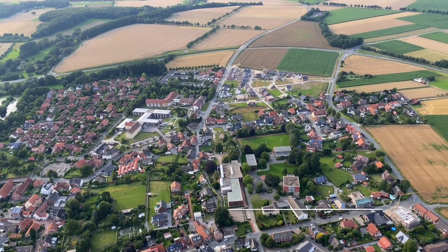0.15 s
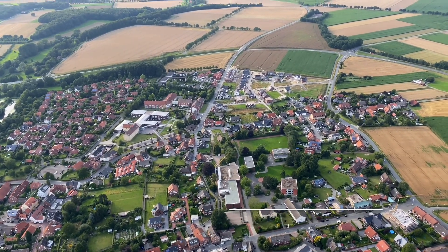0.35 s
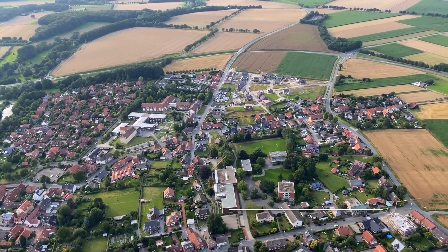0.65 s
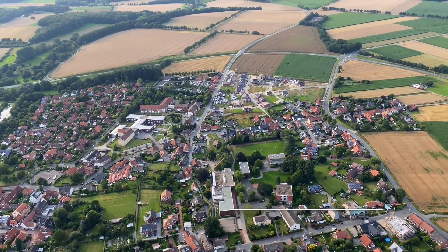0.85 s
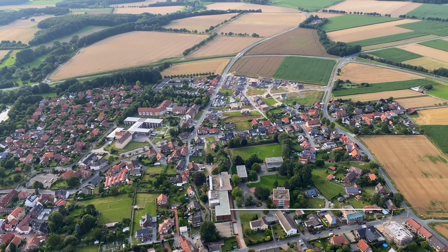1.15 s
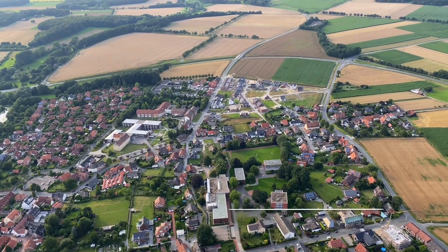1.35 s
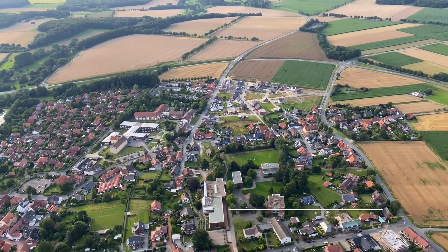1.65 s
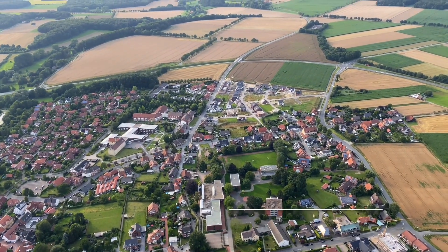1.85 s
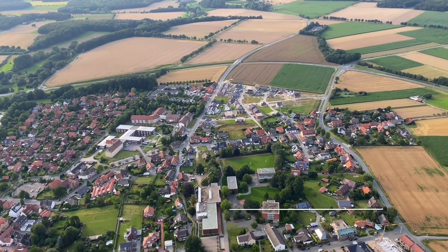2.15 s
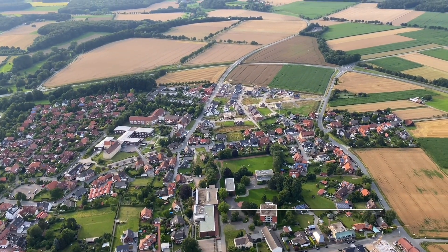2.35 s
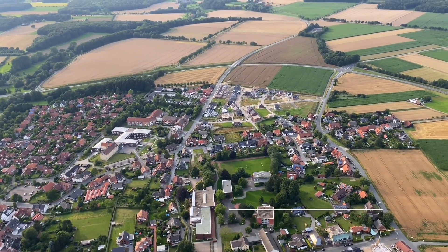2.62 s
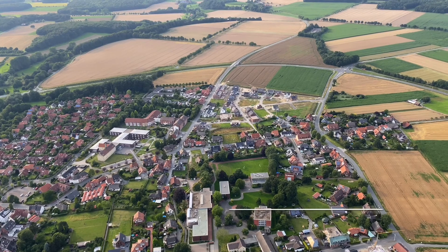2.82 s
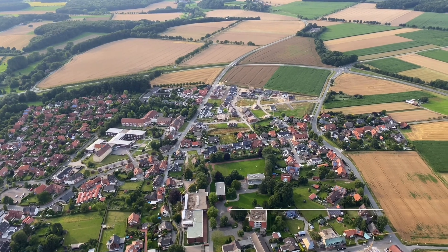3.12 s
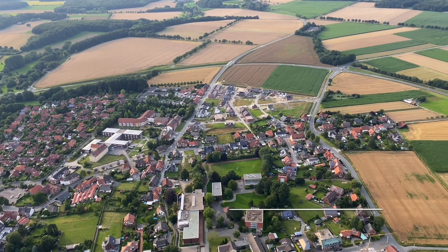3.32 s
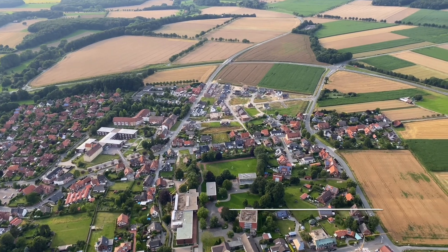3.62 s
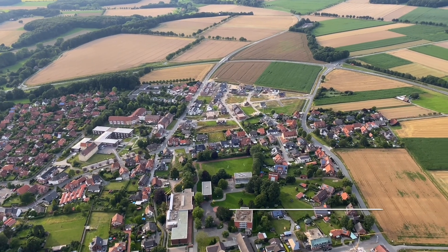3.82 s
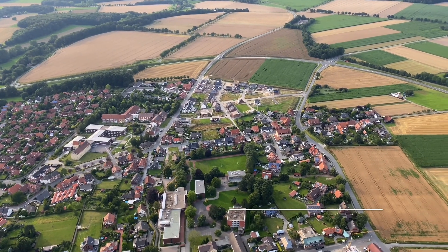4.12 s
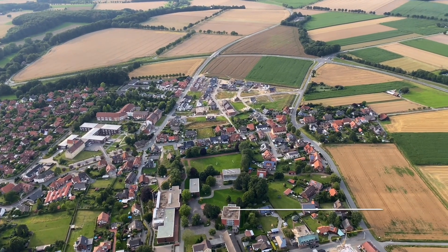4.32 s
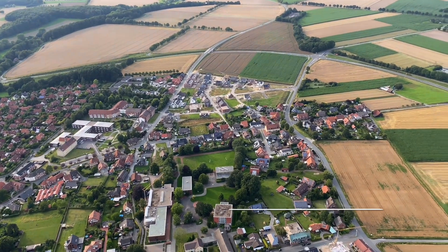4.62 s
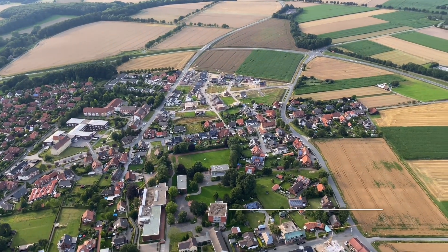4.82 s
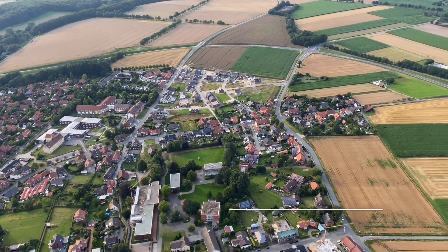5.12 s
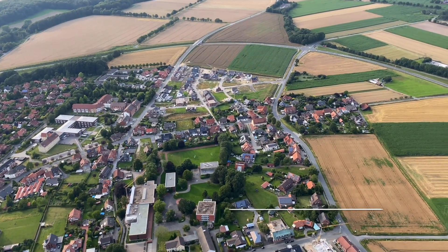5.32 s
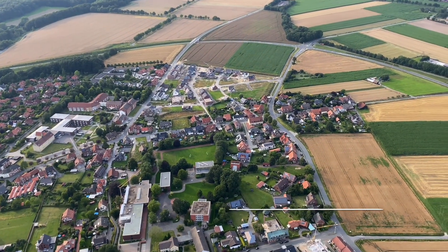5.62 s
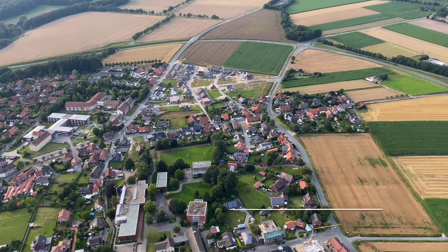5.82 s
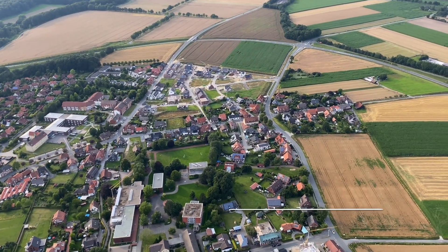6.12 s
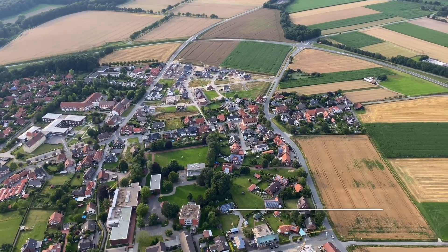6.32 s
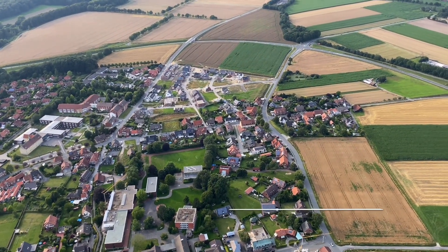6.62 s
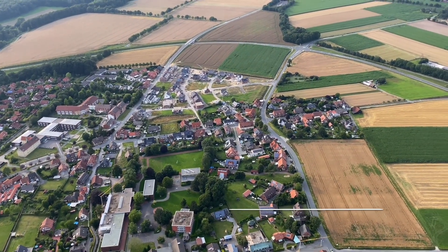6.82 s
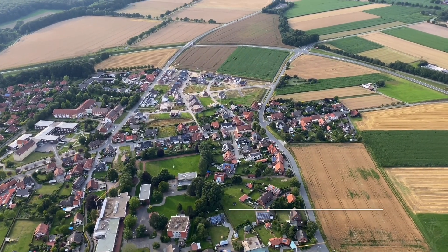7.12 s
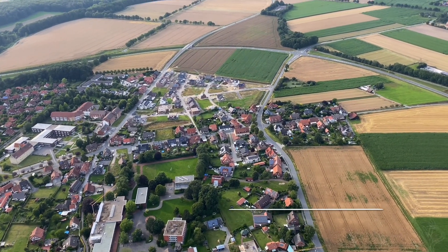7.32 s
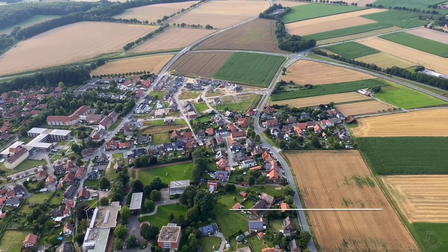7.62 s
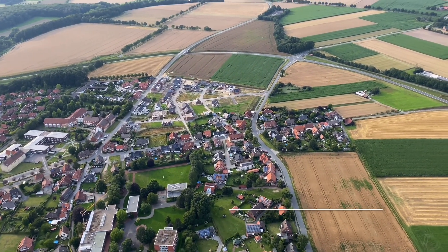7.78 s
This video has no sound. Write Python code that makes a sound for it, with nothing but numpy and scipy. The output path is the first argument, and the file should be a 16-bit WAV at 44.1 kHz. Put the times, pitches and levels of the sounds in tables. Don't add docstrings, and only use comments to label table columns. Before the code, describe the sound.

Small aircraft cabin in flight, heard on a handheld stereo microphone. Wind briefly bumps it, then a steady bass-heavy piston engine hum and propeller throb continue. Later a draught swells from the left with heavy low knocks and roar. The low end abruptly cuts away, leaving a dry, spitting, sizzling rush with sharp little ticks and a dull bump near the end, the engine faint and unsteady beneath.

```python
import sys
import numpy as np
from scipy import signal
from scipy.fft import rfft, irfft
from scipy.io import wavfile
from scipy.ndimage import uniform_filter1d, minimum_filter1d

SR = 44100
rng = np.random.default_rng(int(sys.argv[2]) if len(sys.argv) > 2 else 0)


def transcribe(signal):
    frames = np.atleast_2d(signal).T
    limited = np.clip(frames, -1, 1)
    pcm = np.round(limited * 32767).astype(np.int16)
    wavfile.write(sys.argv[1], SR, pcm)


def voltage_ratio(level):
    return 10 ** (np.asarray(level, float) / 20)


N = 350595

# (time [s], rate [turns/s])
CRANK_SPEED = [(0, 72.17), (.6, 72.25), (1.4, 72.02), (2.4, 71.93), (3.1, 72.17), (3.6, 72.13),
               (4.1, 72.35), (5, 72.1), (8, 72.1)]
# (multiple of crank rate [-], left level [dB], right level [dB])
ENGINE_ORDERS = [(1, -18.6, -18.8), (2, -17.0, -17.1), (4, -35.0, -36.5), (6, -38.6, -44.4),
                 (8, -41.4, -45.7), (10, -44.1, -49.6), (13, -44.6, -49.2), (14, -45.0, -51.1),
                 (15, -51.4, -55.9), (16, -51.2, -55.1), (17, -52.6, -56.5), (18, -42.6, -50.0),
                 (20, -48.0, -62.3), (21, -49.1, -54.0), (22, -45.9, -70.4), (23, -51.7, -52.2),
                 (25, -51.4, -61.5), (26, -49.7, -57.6), (28, -52.7, -60.2), (30, -61.1, -63.7),
                 (31, -58.2, -62.2), (32, -58.1, -77.7), (33, -52.3, -67.9), (35, -59.1, -64.4),
                 (36, -61.3, -72.4), (37, -58.1, -80.7), (38, -49.8, -64.7), (39, -66.3, -72.5),
                 (40, -64.9, -78.6), (48, -66.0, -71.8)]
# (multiple of blade rate [-], left level [dB], right level [dB])
BLADE_ORDERS = [(1, -31.3, -29.8), (2, -22.6, -21.6), (3, -38.5, -43.0), (4, -33.4, -37.0),
                (5, -39.6, -45.6), (6, -41.1, -43.4), (7, -37.0, -49.4), (8, -37.2, -44.0),
                (10, -44.6, -47.9), (11, -49.9, -62.1), (12, -43, -48), (13, -55.8, -66.0),
                (14, -46.8, -62.3), (15, -49.0, -63.2), (16, -57.6, -65.3), (17, -51.6, -64.1),
                (18, -57.7, -67.8), (22, -61.9, -76.3)]
# (time [s], level [dB])
FIRING = [
    [(0, -15), (1.01, -14), (1.08, -20), (1.9, -16.5), (4.3, -13.5), (4.99, -22.5)],
    [(5.03, -30.5), (5.5, -31), (5.75, -44), (6.1, -29), (6.36, -40.5), (6.48, -22), (6.64, -21.5),
     (6.69, -30), (6.93, -23.5), (7.17, -35.5), (7.55, -28.5), (7.95, -25.5)],
]
# (time [s], level [dB])
WIND = [
    [(0, -24), (.1, -15), (.45, -17.5), (.64, -15), (.8, -21.5), (1.1, -33.5), (3, -29.5), (3.95, -20.5),
     (4.1, -14.5), (4.3, -10), (4.62, -8.5), (4.99, -9.5)],
    [(5.03, -28), (5.6, -30.5), (6.2, -36.5), (6.5, -35), (7.2, -33), (7.95, -46.5)],
]
# (time [s], peak [dB])
KNOCKS = [(0.08, -14.5), (0.111, -19.5), (0.194, -19), (0.392, -14.5), (0.437, -16), (0.575, -15),
          (0.64, -14), (0.695, -17), (0.752, -22), (0.85, -16.5), (0.96, -18), (3.363, -20.5), (4.159, -14),
          (4.198, -13.5), (4.23, -11), (4.302, -19.5), (4.4, -12), (4.505, -4), (4.56, -2), (4.434, -5.5),
          (4.717, -4.5), (4.772, -6), (4.869, -6.5)]
# (time [s], level [dB], crackle above usual share [dB])
DRAUGHT = [(3.6, -73, 0), (4.08, -41.5, -2), (4.19, -42, -0.5), (4.22, -33.5, -1), (4.25, -38.5, -1.5),
           (4.57, -24, -2), (4.65, -26.5, -2.5), (4.92, -24, -2), (5.05, -26.5, -2.5), (5.4, -28, 1),
           (5.82, -30.5, 4), (5.9, -33, 1.5), (6.2, -32.5, 1.5), (6.5, -30.5, 0), (7.2, -30.5, -0.5),
           (7.95, -30, -1.5)]
# (time [s], peak [dB])
SNAPS = [(0.821, -33.5), (4.232, -36), (4.4376, -31.5), (4.4612, -33), (4.5025, -38.5), (4.6323, -21.5),
         (4.762, -36.5), (4.825, -37), (5.0574, -36), (5.7498, -35.5), (5.793, -25.5), (5.9712, -30),
         (6.166, -31), (6.2717, -32.5), (6.3086, -30), (6.4545, -38.5), (6.575, -35.5), (6.6386, -30.5),
         (6.8632, -27), (6.9082, -30.5), (6.9368, -28), (7.059, -34.5), (7.099, -34.5), (7.206, -30.5),
         (7.3732, -22), (7.486, -34), (7.5273, -36), (7.6235, -35.5), (7.727, -32), (7.8827, -34.5)]
# (time [s], pitch [Hz], peak [dB], half length [s])
BUMP = (7.495, 212, -19.5, .03)
# (frequency [Hz], density [dB/Hz])
BOOM_COLOUR = [(20, -40), (45, -4.5), (65, 4.5), (120, 4.5), (230, 3), (330, -4.5), (500, -32), (900, -60)]
BOOM_FILTERED_COLOUR = [(20, -45), (35, -22), (50, -6.5), (90, 4), (180, 2), (300, -9), (500, -11.5),
                        (900, -59.5)]
# (frequency [Hz], density [dB/Hz])
HISS_COLOUR = [(250, -56.5), (400, -52), (600, -57), (750, -59.5), (900, -62.5), (1100, -63.5),
               (1500, -64.5), (2200, -74), (3200, -79), (4800, -86.5), (6200, -98), (10200, -99),
               (12500, -100), (15800, -104)]
# (frequency [Hz], density [dB/Hz])
BUFFET_COLOUR = [(120, -3), (250, 2), (350, 4), (550, -9.5), (800, -26), (1300, -30.5), (2500, -77)]
ROAR_COLOUR = [(300, -7), (500, 1), (750, -3), (1100, -10.5), (1700, -18.5), (3000, -57.5)]
# (frequency [Hz], density [dB/Hz])
RUSH_COLOUR = [(150, 5.5), (350, -1.5), (700, 0.5), (1200, 2.5), (2000, -1), (3000, -19.5), (4200, -34.5),
               (6500, -49)]
CRACKLE_COLOUR = [(900, -18), (1800, 0.5), (2600, 0), (4200, -8.5), (5500, -18), (6500, -24.5),
                  (9000, -42.5)]
SIZZLE_COLOUR = [(4500, -20.5), (6500, -5), (8000, -1.5), (10000, -4.5), (13000, -16), (15800, -15.5)]
# (frequency [Hz], level [dB], lead [rad], likeness [0-1])
PORTS_CABIN = [(60, -0.1, -0.1, 1.0), (250, 0.2, -0.39, 0.97), (400, -3.2, -1.12, 0.75),
               (550, -5.6, -2.2, 0.71), (750, -7.5, -2.95, 0.85), (1000, -3.5, -3.53, 0.95),
               (1300, -6.3, -4.32, 0.77), (1600, -9.9, -4.09, 0.4), (2000, -5.6, -6.92, 0.85),
               (2700, -13.2, -6.4, 0.64), (3500, -7.2, -7.46, 0.74), (5000, -7.6, -6.13, 0.43),
               (6200, 1.1, -6.7, 0.58), (6800, 1.2, -6.26, 0.82)]
PORTS_DRAUGHT = [(40, 1.4, -0.34, 0.74), (150, 0.2, -0.47, 0.94), (500, -1.0, -1.01, 0.95),
                 (700, -7.5, -1.27, 0.81), (830, -12.2, -0.56, 0.35), (950, -11.4, 0.62, 0.47),
                 (1250, -10.3, 0.76, 0.71), (1500, -10.5, -0.15, 0.81), (2900, -10.2, -0.87, 0.9),
                 (4000, -7.4, -0.3, 0.9), (5000, -12.4, -0.04, 0.73), (5600, -14.5, -0.47, 0.38),
                 (6200, -4.3, -0.65, 0.77), (6800, -0.2, -0.04, 0.96)]
PORTS_FLOW = [(40, 0, -.1, .99), (200, .3, -.3, .99), (400, -2, -.8, .93), (700, -6, -1.2, .85),
              (1000, -11, -.6, .6)]

T = np.arange(N) / SR
HZ = np.maximum(np.arange(N // 2 + 1) * SR / N, 1)
FILTERED = np.clip((T - 5.01) / 0.012 + 0.5, 0, 1)


def curves(rows):
    s, *columns = np.transpose(rows)
    return [np.interp(T, s, c) for c in columns]


def over_hz(rows, hz=HZ):
    at, *columns = np.transpose(rows)
    return [np.interp(np.log(hz), np.log(at), c) for c in columns]


def walk(rate_hz):
    k = int(SR / rate_hz)
    held = np.repeat(rng.standard_normal(N // k + 1), k)
    return 0.62 * uniform_filter1d(uniform_filter1d(held, k), k)[:N]


def unit(x):
    return x / np.sqrt(np.mean(x ** 2))


def heard(envelope, colour, ports, noisy=True):
    source = envelope * (rng.standard_normal((2, N)) if noisy else np.ones((2, 1)))
    spectra = rfft(source) * voltage_ratio(over_hz(colour)[0]) * np.sqrt(SR / 2)
    near, other = np.minimum(HZ / colour[0][0], 1) ** 3 * spectra
    db, lead_rad, like = over_hz(ports)
    treble_from_hz, turn_hz = 6750, 4420
    treble = HZ > treble_from_hz
    lead_rad[treble] = 2 * np.pi * (HZ[treble] - treble_from_hz) / turn_hz
    db[treble], like[treble] = 0, 0.994
    mixed = like * near + np.sqrt(1 - like ** 2) * other
    right = voltage_ratio(db) * np.exp(1j * lead_rad) * mixed
    return irfft(np.array([near, right]), N)


def bursts(rate_hz, spread_db, width_s, most):
    when, size = rng.random((2, N))
    size_db = spread_db * np.minimum(-np.log(size + 1e-9), most)
    hits = (when < rate_hz / SR) * voltage_ratio(size_db)
    shape = np.exp(-(np.arange(-300, 300) / SR / width_s) ** 2)
    return unit(signal.fftconvolve(hits, shape, "same"))


CRANK_TURNS = np.cumsum(curves(CRANK_SPEED)[0]) / SR
BLADE_TURNS = 1.4115 * CRANK_TURNS
FIRING_DB = curves(FIRING[0] + FIRING[1])[0]
DRAUGHT_DB, CRACKLE_EXTRA_DB = curves(DRAUGHT)
OVER_DUCK_DB = np.maximum(DRAUGHT_DB + 39, 0)
CABIN_GAIN = voltage_ratio(-9.5 * FILTERED - 1.16 * OVER_DUCK_DB)


def cabin_hiss():
    throb = 1 + 0.22 * np.cos(2 * np.pi * CRANK_TURNS)
    throb += 0.3 * np.cos(2 * np.pi * BLADE_TURNS) + 0.25 * np.cos(4 * np.pi * BLADE_TURNS)
    flicker = voltage_ratio(0.5 * walk(40) + 1.2 * walk(250))
    return CABIN_GAIN * heard(unit(throb * flicker), HISS_COLOUR, PORTS_CABIN)


def wind_boom():
    boom_db = -12 - 7.5 * FILTERED + 0.41 * (FIRING_DB + 16) + 0.76 * walk(9)
    swell = voltage_ratio(0.8 * walk(20))
    full = unit(heard(swell, BOOM_COLOUR, PORTS_FLOW))
    thinned = unit(heard(swell, BOOM_FILTERED_COLOUR, PORTS_FLOW))
    return voltage_ratio(boom_db - 3.0) * (full + (thinned - full) * FILTERED)


def stack(turns, orders, gains, waver_db):
    out = np.zeros((2, N))
    shake_db = 1.2 + 1.3 * FILTERED
    for k, left_db, right_db in orders:
        angle = 2 * np.pi * (k * turns + rng.random())
        lead_rad = over_hz(PORTS_CABIN, k * turns[-1] / T[-1])[1]
        waver = waver_db * walk(4)
        if k < 5:
            waver = waver + shake_db * walk(16)
        size = np.sqrt(2) * gains(k, left_db) * voltage_ratio(waver)
        out[0] += voltage_ratio(left_db) * size * np.cos(angle)
        out[1] += voltage_ratio(right_db) * size * np.cos(angle + lead_rad)
    return out


def engine_and_propeller():
    drift_db = 2 + 0.5 * FILTERED
    crank_db = -16.5 - 24.5 * FILTERED + drift_db * walk(7)
    blade_db = -21 - 11.5 * FILTERED - 0.25 * OVER_DUCK_DB + drift_db * walk(8.3)
    firing_db = FIRING_DB + 1.3 * walk(11)
    low_db = {1: crank_db - 3.2, 2: firing_db - 0.5}
    fourth = voltage_ratio(0.75 * (firing_db + 17))

    def engine_gain(k, left_db):
        if k in low_db:
            return voltage_ratio(low_db[k] - left_db)
        return fourth if k == 4 else CABIN_GAIN

    def blade_gain(k, left_db):
        return voltage_ratio(blade_db + 22.0 - 3.0 * FILTERED) if k < 5 else CABIN_GAIN

    tones = stack(CRANK_TURNS, ENGINE_ORDERS, engine_gain, waver_db=1.5)
    tones += stack(BLADE_TURNS, BLADE_ORDERS, blade_gain, waver_db=1.4)
    return voltage_ratio(0.43) * tones


def bump():
    s, hz, peak_db, half_s = BUMP
    return voltage_ratio(peak_db) * np.exp(-((T - s) / half_s) ** 2) * np.sin(2 * np.pi * hz * T)


def buffeting():
    wind_db = curves(WIND[0] + WIND[1])[0]
    wind_db = wind_db + 2.5 * np.clip(-wind_db / 25, 0, 1.2) * walk(14)
    gusts = voltage_ratio(1.2 * walk(60) + 1.5 * walk(200))
    buffet = voltage_ratio(wind_db - 3.5) * unit(heard(gusts, BUFFET_COLOUR, PORTS_FLOW))
    roar = voltage_ratio(2.3 * wind_db + 3.5) * unit(heard(gusts, ROAR_COLOUR, PORTS_DRAUGHT))
    return buffet + roar


def gust_knocks():
    rise_s, fall_s = 0.002, 0.009
    envelope = np.zeros(N)
    for s, peak_db in KNOCKS:
        after_s = T - s - 0.002
        envelope += voltage_ratio(peak_db) * np.exp(-np.maximum(-after_s / rise_s, after_s / fall_s))
    return voltage_ratio(-30) * heard(envelope, ROAR_COLOUR, PORTS_DRAUGHT)


def snaps():
    top, body = np.zeros((2, N))
    for s, peak_db in SNAPS:
        at = int((s + 0.0011) * SR)
        top[at] = voltage_ratio(peak_db)
        body[at] = voltage_ratio(-23 + 0.25 * (peak_db + 35))
    # (frequency [Hz], density [dB/Hz])
    thin = [(4000, -57), (6500, -31.5), (11000, -36), (15800, -31)]
    dull = [(800, -21), (1600, -15), (3000, -22.5), (5000, -31.5), (7000, -57.5)]
    ticks = heard(top, thin, PORTS_DRAUGHT, noisy=False)
    return ticks + heard(body, dull, PORTS_DRAUGHT, noisy=False)


def draught():
    over_full_db = DRAUGHT_DB + 30.5
    crackle_db = -32.5 + 1.53 * over_full_db + CRACKLE_EXTRA_DB
    full_s, growth_db_s = 4.55, 1.16
    arriving_db = np.minimum(over_full_db, 0) * (T < full_s)
    sizzle_db = -50.5 + 1.9 * arriving_db + growth_db_s * (T - full_s) + 2.2 * walk(31)
    eddies = voltage_ratio(1.8 * walk(300) + 0.3 * walk(60))
    ticks = bursts(380, spread_db=4.3, width_s=0.00035, most=2.7)
    sparks = bursts(90, spread_db=5.0, width_s=0.0003, most=3.6)
    rush = unit(heard(eddies * (1 + 0.2 * ticks), RUSH_COLOUR, PORTS_DRAUGHT))
    crackle = unit(heard(eddies * (1.3 + ticks), CRACKLE_COLOUR, PORTS_DRAUGHT))
    sizzle = unit(heard(0.9 + 0.35 * ticks + 0.85 * sparks, SIZZLE_COLOUR, PORTS_DRAUGHT))
    return voltage_ratio(DRAUGHT_DB + 4.0) * rush + voltage_ratio(crackle_db) * crackle + voltage_ratio(sizzle_db) * sizzle


def scene():
    cabin = cabin_hiss() + wind_boom() + engine_and_propeller()
    return cabin + bump() + buffeting() + gust_knocks() + snaps() + draught()


def band_limit(x):
    return signal.sosfilt(signal.butter(12, 16970, fs=SR, output="sos"), x)


def record(dry):
    ceiling, top_hz = 0.93, 15830
    room_left = minimum_filter1d(np.minimum(1, ceiling / np.abs(dry).max(axis=0)), size=441)
    held = dry * uniform_filter1d(uniform_filter1d(room_left, size=220), size=220)
    mix = irfft(rfft(held) * (HZ < top_hz), N)
    return band_limit(mix)


dry = scene()
out = record(dry)
transcribe(out)
```